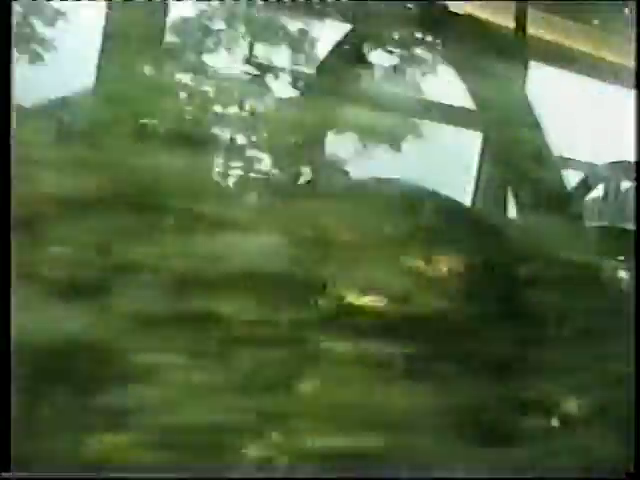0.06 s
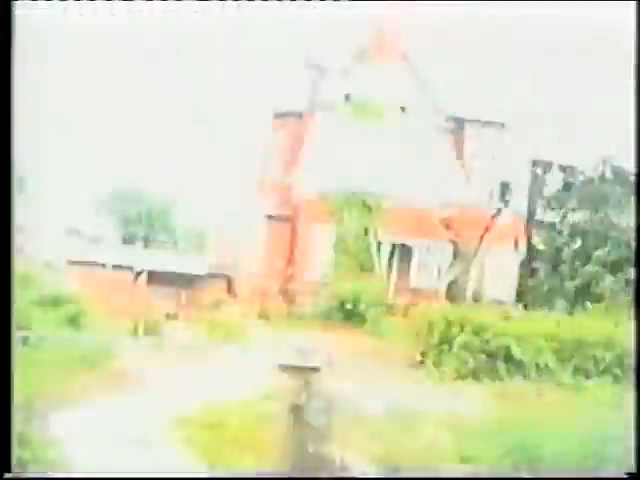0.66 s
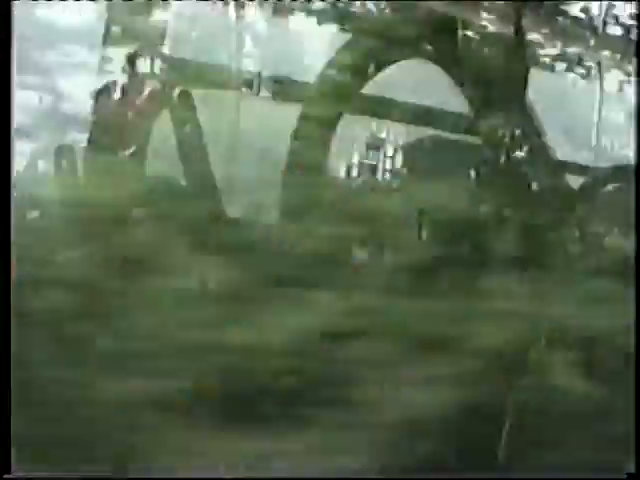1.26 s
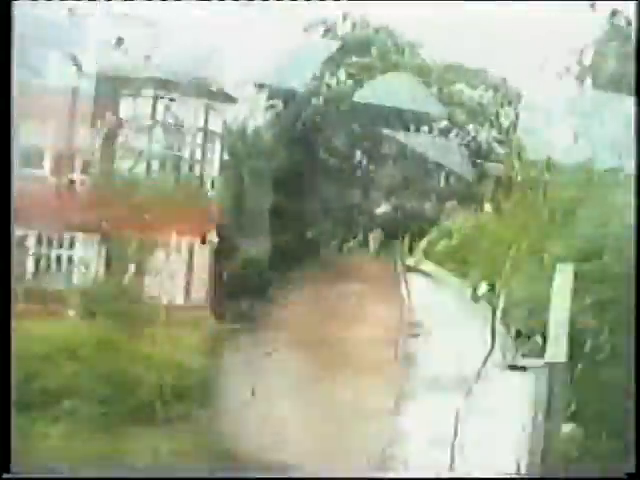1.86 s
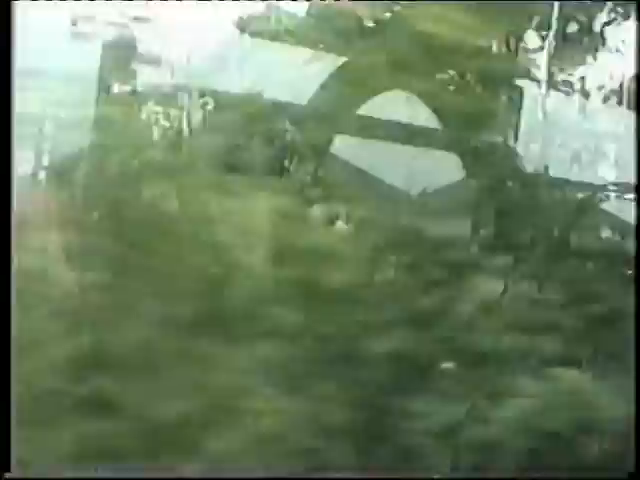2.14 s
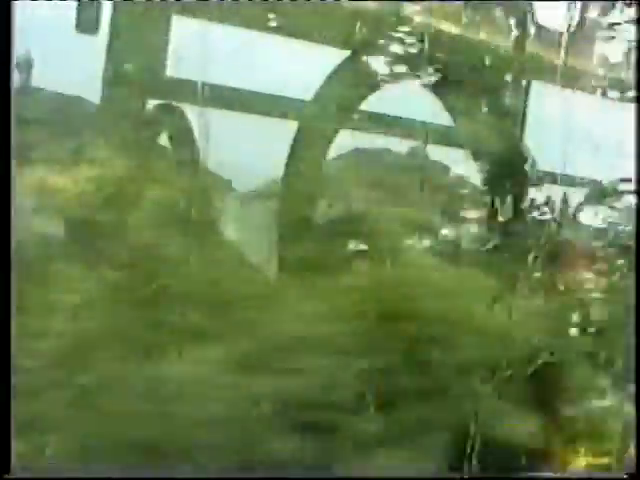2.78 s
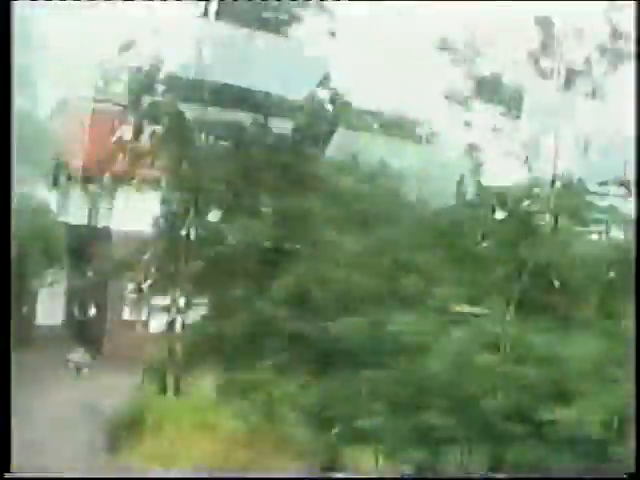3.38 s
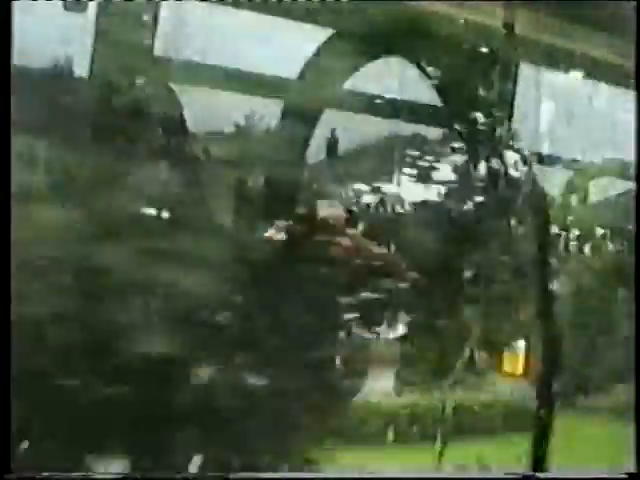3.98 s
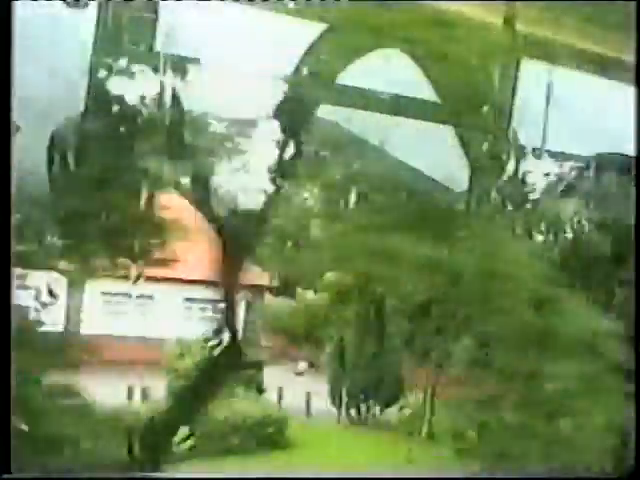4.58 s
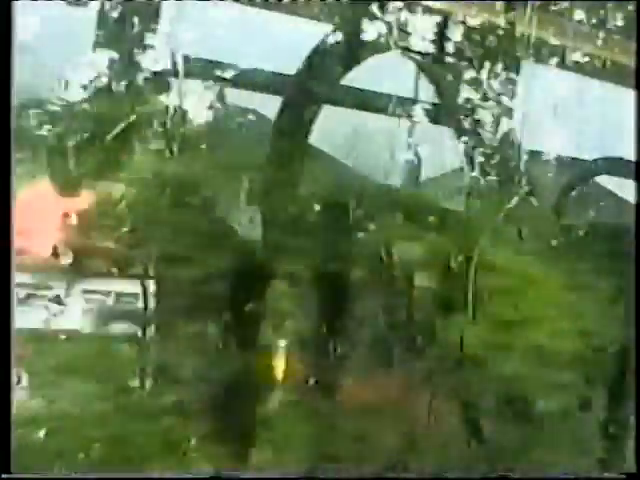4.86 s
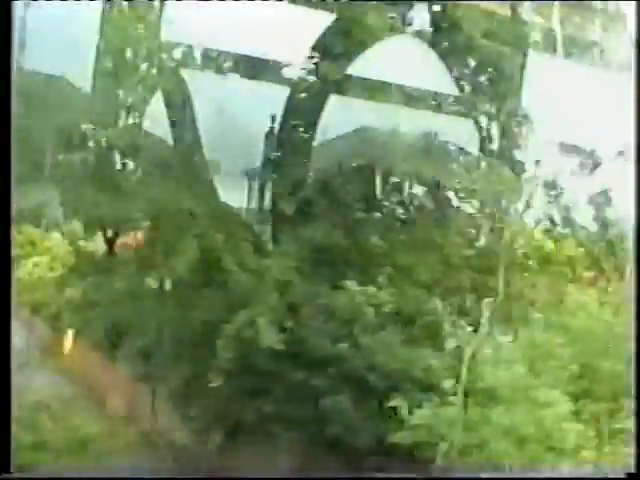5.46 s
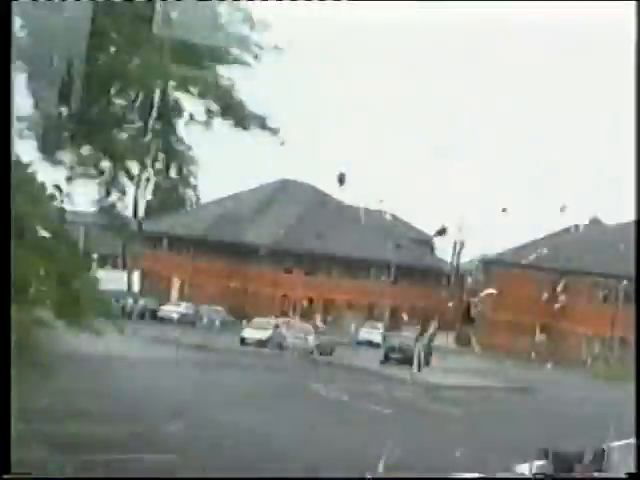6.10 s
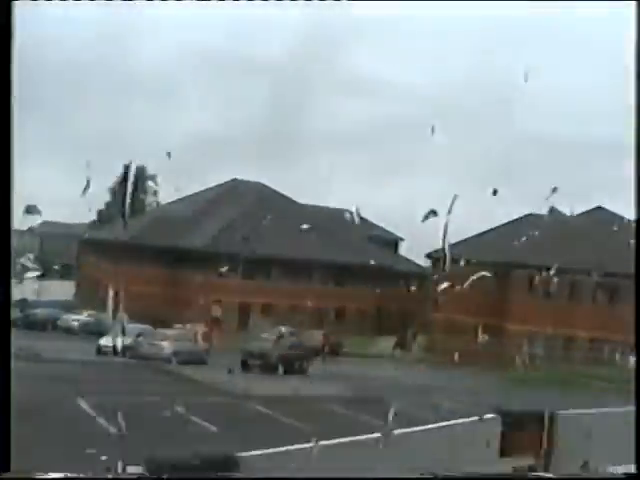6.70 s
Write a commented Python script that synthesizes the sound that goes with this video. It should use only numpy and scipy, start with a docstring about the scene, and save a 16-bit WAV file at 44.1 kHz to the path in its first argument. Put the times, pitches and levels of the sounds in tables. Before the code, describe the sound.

A train carriage rumbles along with a low roar and diesel hum, soft track thumps and light clicks of loose fittings.

```python
"""Inside a diesel train passing houses on a wet day, wheels and rushing air make a steady low roar.
The track drives the carriage's modes into a boom, periodic firing drones under the floor, and meshing
gears whine on and off. Loose fittings click by impact, and friction makes brief rustles. A tape camcorder
adds hiss, a faint motor buzz and a line whistle, and notches out the harmonics of its head drum."""
import sys
import numpy as np
from scipy import signal
from scipy.fft import rfft, irfft, next_fast_len
from scipy.io import wavfile

SR = 44100
rng = np.random.default_rng(int(sys.argv[2]) if len(sys.argv) > 2 else 0)


def transcribe(signal):
    """Save signal, clipped to [-1, 1], as a 16-bit WAV file at the path in sys.argv[1]."""
    frames = np.atleast_2d(signal).T
    limited = np.clip(frames, -1, 1)
    pcm = np.round(limited * 32767).astype(np.int16)
    wavfile.write(sys.argv[1], SR, pcm)


N = 297234

# Spectra of carriage, wheels, window air and tape. Each row: frequency in Hz, relative density in dB.
BOOM_SPECTRUM = [(15, -32), (28, -9.5), (45, -15), (65, -4.5), (88, -0.5), (110, -2), (135, -3), (168, -4),
                 (205, 3), (240, -3), (275, -6), (320, -15), (500, -62), (900, -100)]
WHEEL_SPECTRUM = [(150, -27), (310, -2.5), (385, 0), (445, -3), (490, -4), (525, -1.5), (570, -2.5),
                  (640, -1.5), (860, -6), (1100, -12.5), (1450, -17), (1850, -17), (2400, -26), (6000, -68)]
AIR_SPECTRUM = [(600, -38), (1800, -11), (2400, -1), (3350, 2), (4000, -4.5), (5000, -8.5), (6300, -16),
                (8000, -26), (15000, -50)]
HISS_SPECTRUM = [(100, -8), (4000, 3), (8000, 0.5), (12000, 0), (15500, -6.5)]
# Shaking by the track, smoother at the end. Each row: time in seconds, gain in dB.
TRACK_SHAKE = [(0, 0), (.75, -1.5), (1.6, 1.2), (3, -0.46), (4.8, -0.4), (6.25, 0.7), (6.45, -3),
               (6.74, -5)]
# Engine speed. Each row: time in seconds, cycles per second.
CYCLE_RATE = [(0, 9.13), (1, 9.1), (1.9, 9.165), (2.5, 9.24), (3.4, 9.205), (4.3, 9.265), (5.3, 9.215),
              (6, 9.15), (6.74, 9.06)]
# Hum at the firing rate. Each row: time in seconds, level in dB.
FIRING_HUM = [(0, -33), (.7, -35), (1.5, -30.5), (2.5, -28.5), (3.6, -32), (6.74, -31.5)]
# The engine's other harmonics. Each row: multiple of the cycle rate, relative level in dB.
ENGINE_ORDERS = [(3, -26), (6, -10.5), (7, -10.5), (8, -8), (9, -4), (10, -4), (11, -5), (13, -7),
                 (14, -24), (15, -7.5), (18, -2.5), (19, -10), (20, -16), (21, -4.5), (22, -9), (23, -13),
                 (24, -1), (25, -13.5), (26, -9.5), (27, -6.5), (29, -16), (30, -8), (34, -10.5), (38, -19),
                 (42, -19.5), (57, -15.5), (70, -18)]
# Track jolts. Each row: start in seconds, level in dB, share of the power in the low mode.
TRACK_JOLTS = [(.103, -19.5, 0.33), (.461, -21, .55), (.829, -27, 0), (.987, -29.5, 0.5),
               (1.088, -23.5, .1), (2.69, -22.5, .1), (3.2, -27, .9), (3.722, -25.5, 0.97),
               (5.386, -28, 0.15)]
# The body's low and high mode. Each row: frequency in Hz, rise time in seconds.
BODY_MODES = [(89, 0.024), (198, 0.017)]
# Blows on fittings. Each row: start in seconds, level in dB, contact cutoff in Hz, t60 in seconds.
FITTING_KNOCKS = [(.19, -37, 1200, 0.066), (0.4263, -24.5, 5000, 0.015), (0.4328, -27, 2500, .01),
                  (.552, -36.5, 9000, .04), (.641, -40, 2500, .07), (3.696, -34, 700, 0.029),
                  (4.053, -38, 2500, .04), (5.366, -43, 4000, .077), (5.789, -35, 2000, 0.08)]
# Modes of the trim. Each row: frequency in Hz, bandwidth in Hz, relative level in dB.
PANEL_MODES = [(1244, 100, 3), (1620, 140, 3), (1940, 114, 1), (3000, 440, -11), (4250, 500, -11),
               (6200, 700, -14)]
# Tiny contacts. Each row: start in seconds, level in dB, centre frequency in Hz.
FITTING_TICKS = [(.042, -43, 4800), (.114, -43, 4800), (.167, -46, 4800), (.3, -43, 4800),
                 (.552, -47, 3500), (.679, -43, 4200), (.749, -49, 4800), (3.478, -48, 6000),
                 (3.9215, -49, 7500)]
# Swells of the gear tone. Each row: start and length in seconds, level in dB, attack in seconds.
GEAR_SWELLS = [(1.27, 0.47, -53.5, 0.056), (1.8, .52, -64, .06), (3.25, 1.15, -61, .25),
               (5.74, .5, -54.8, 0.28)]
# Rubbing strokes. Each row: start and length in seconds, level in dB, centre frequency in Hz.
RUB_STROKES = [(.01, .19, -48.5, 2390), (0.259, .14, -51, 2500), (0.549, 0.073, -50, 2800),
               (.66, .14, -47.5, 2500), (2.28, .03, -54.5, 5500), (2.69, .025, -52, 3000),
               (2.868, .06, -51.5, 1400), (3.66, 0.11, -60, 4500), (4.36, .06, -50, 1600),
               (6.08, 0.055, -59, 5500)]
# Camcorder motor buzz. Each row: frequency in Hz, relative level per harmonic in dB.
BUZZ_SPECTRUM = [(4000, -15), (6500, -3), (8800, -1), (11000, -2.5), (13500, -5), (15500, -7)]


def amp(db):
    """Decibels to gain."""
    return 10 ** (np.asarray(db) / 20)


def unit(x):
    """Scale to rms 1."""
    return x / np.sqrt(np.mean(x ** 2) + 1e-20)


def clock():
    """The time of every sample."""
    return np.arange(N) / SR


def along(points, hz):
    """Interpolate (Hz, value) points on a log axis."""
    freqs, values = np.transpose(points)
    return np.interp(np.log(hz + 1), np.log(freqs + 1), values)


def curve(rows):
    """Interpolate (seconds, value) points at every sample."""
    return np.interp(clock(), *np.transpose(rows))


def wobble(rate, oversample=8):
    """Band-limited random motion, rate knots a second."""
    knots = rng.standard_normal(int(N * rate / SR) + 4)
    smooth = signal.resample(knots, oversample * len(knots))
    return np.interp(clock() * rate * oversample, np.arange(len(smooth)), smooth)


def swell(length, attack, release):
    """A trapezoidal envelope that rises, holds until length and then falls."""
    t = np.arange(int((length + release) * SR)) / SR
    return np.clip(np.minimum(t / attack, (length + release - t) / release), 0, 1)


def filtered(x, response):
    """Linear filtering: the spectrum of x times a frequency response."""
    size = next_fast_len(len(x) + 8192)
    return irfft(rfft(x, size) * response(np.fft.rfftfreq(size, 1 / SR)), size)[:len(x)]


def noise(spectrum):
    """Noise of rms 1 with the given (Hz, dB) colour."""
    return unit(filtered(rng.standard_normal(N), lambda hz: amp(along(spectrum, hz))))


def resonance(hz, centre, width):
    """Response of one damped mode."""
    return 1j * hz * width / (centre ** 2 - hz ** 2 + 1j * hz * width)


def band(centre, width, size):
    """Resonant noise of rms 1; width is a share of the centre frequency."""
    white = rng.standard_normal(size)
    return unit(filtered(white, lambda hz: resonance(hz, centre, width * centre) ** 2))


def tone(hz):
    """A sine of rms 1 whose phase integrates a frequency curve."""
    return np.sqrt(2) * np.sin(2 * np.pi * (np.cumsum(hz) / SR + rng.random()))


def add(out, start, sound):
    """Superpose a sound from start seconds on."""
    first = int(np.clip(round(start * SR), 0, N))
    out[first:first + len(sound)] += sound[:N - first]


def wheels_and_air(boom_db=-30, roar_db=-38.9, air_db=-54):
    """Random forcing: wheels shake the carriage and air rushes past, all following the track."""
    shake_db = curve(TRACK_SHAKE)
    flutter = wobble(22)  # common to roar and rush
    rough_db = np.zeros(N)  # a short stretch of rough rail
    add(rough_db, start=3.47, sound=1.5 * swell(length=.23, attack=.092, release=.092))
    boom = amp(boom_db + shake_db) * noise(BOOM_SPECTRUM)
    roar = amp(roar_db + .33 * shake_db + rough_db + .5 * flutter) * noise(WHEEL_SPECTRUM)
    rush = amp(air_db + .45 * shake_db + .62 * flutter + .39 * wobble(60)) * noise(AIR_SPECTRUM)
    return boom + roar + rush


def engine(drone_db=-35.5, waver=.0017, firing_order=12):
    """Periodic excitation: firing makes a hum, and unequal cylinders add other orders of the cycle."""
    cycle_hz = curve(CYCLE_RATE) * (1 + waver * wobble(9))
    hum = amp(curve(FIRING_HUM) + 1.15 * wobble(4.5)) * tone(firing_order * cycle_hz)
    drone = sum(amp(db + .59 * wobble(5)) * tone(order * cycle_hz) for order, db in ENGINE_ORDERS)
    return hum + amp(drone_db + curve(TRACK_SHAKE)) * drone  # the body carries it like the boom


def jolts(width=.53):
    """Transient excitation: uneven track thumps the body, and two damped modes share the power."""
    out, t = np.zeros(N), np.arange(SR // 3) / SR
    for start, db, low_share in TRACK_JOLTS:
        for share, (hz, rise) in zip([low_share, 1 - low_share], BODY_MODES):
            envelope = t / rise * np.exp(1 - t / rise)
            boom = unit(envelope * band(hz, width, len(t)))
            add(out, start, amp(db) * np.sqrt(share * np.mean(envelope ** 2)) * boom)
    return out


def fittings(blow=.59, tick_t60=.017):
    """Impact: a blow and its chatter ring loose trim, brighter if harder; tiny contacts only tick."""
    def panel(hz):
        return sum((-1) ** k * amp(db) * resonance(hz, centre, width)
                   for k, (centre, width, db) in enumerate(PANEL_MODES))

    out, t = np.zeros(N), np.arange(SR // 5) / SR
    for start, db, cutoff_hz, t60 in FITTING_KNOCKS:
        decay = amp(-60 * t / t60)
        strength = np.linalg.norm(decay)
        force = blow * strength * (t == 0) + decay * rng.standard_normal(len(t))
        ring = filtered(force, lambda hz: panel(hz) / (1 + 1j * hz / cutoff_hz) ** 2)
        add(out, start, amp(db) * strength * ring / np.linalg.norm(ring))
    for start, db, hz in FITTING_TICKS:
        add(out, start, amp(db - 60 * t / tick_t60) * band(hz, width=.51, size=len(t)))
    return out


def gear_whine(mesh_order=188.8, idle_db=-66.5, waver_hz=3, flutter_db=.7):
    """Tooth meshing: a faint tone at a multiple of the engine's speed sings out now and then."""
    singing = np.zeros(N)
    for start, length, db, attack in GEAR_SWELLS:
        add(singing, start, amp(db) * swell(length, attack, release=.13))
    level = np.hypot(singing, amp(idle_db)) * amp(flutter_db * wobble(30))
    return level * tone(mesh_order * curve(CYCLE_RATE) + waver_hz * wobble(35))


def rustles(grain_db=3.2, cutoff_hz=7500, hollow_hz=810, hollow_db=3):
    """Friction: something rubs close by in grainy strokes, with a hollow resonance under the scrape."""
    out = np.zeros(N)
    for start, length, db, hz in RUB_STROKES:
        stroke = swell(length, attack=.019, release=.04)
        hollow = amp(hollow_db) * band(hollow_hz, width=.31, size=len(stroke))
        scrape = band(hz, width=.91, size=len(stroke))
        add(out, start, amp(db) * stroke * (scrape + hollow))
    grain = unit(amp(grain_db * wobble(400)))
    return filtered(out * grain, lambda hz: 1 / (1 + (hz / cutoff_hz) ** 8))


def motor_buzz(buzz_db=-81, motor_hz=200, smear_s=.00062):
    """Fourier series: three unequal switching chirps per camcorder motor cycle give a line spectrum."""
    orders = np.arange(25, 78)
    hz = orders * motor_hz
    pulses = np.array([1, .75, .25])
    weights = np.fft.fft(pulses)[orders % len(pulses)] / pulses.sum()
    lines = weights * amp(buzz_db + along(BUZZ_SPECTRUM, hz))
    chirp = np.exp(-1j * np.pi * smear_s * (hz - hz[0]) ** 2 / np.ptp(hz))  # the highs come later
    two_cycles = clock()[:2 * SR // motor_hz]
    harmonics = np.exp(2j * np.pi * np.outer(hz, two_cycles))
    return np.resize(np.sqrt(2) * np.real((lines * chirp) @ harmonics), N)


def line_whistle(whistle_db=-68.5, flicker_db=.8, line_hz=15625):
    """Amplitude modulation: the tone at the camcorder's line-scan rate flickers in level."""
    return amp(whistle_db + flicker_db * wobble(220) + .4 * wobble(3)) * tone(np.full(N, line_hz))


def drum_comb(hz, drum_hz=150, feedback=.6):
    """Destructive interference: a delay of one head-drum turn cancels each multiple of its rate."""
    delay = np.exp(-2j * np.pi * hz / drum_hz)
    return (1 - delay) / (1 - feedback * delay) * (1 + feedback) / 2


def scene():
    """Superposition: the sources in the carriage sum to one channel."""
    return (wheels_and_air() + engine() + gear_whine() + jolts() + fittings() + rustles())[None]


def record(dry, hiss_db=-64, top_hz=15760):
    """Additive noise: the camcorder's own sounds join after its comb filter, and all is band-limited."""
    combed = filtered(dry[0], drum_comb)
    self_noise = motor_buzz() + line_whistle() + amp(hiss_db) * noise(HISS_SPECTRUM)
    return filtered(combed + self_noise, lambda hz: hz < top_hz)[None]


dry = scene()
out = record(dry)
transcribe(out)
```